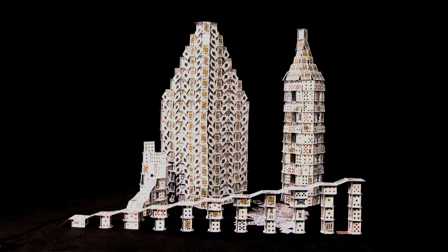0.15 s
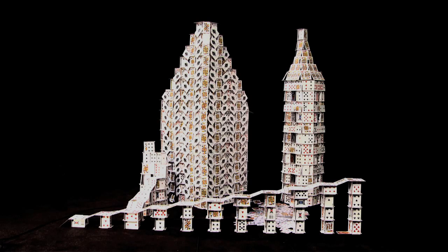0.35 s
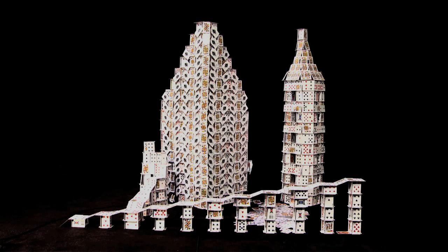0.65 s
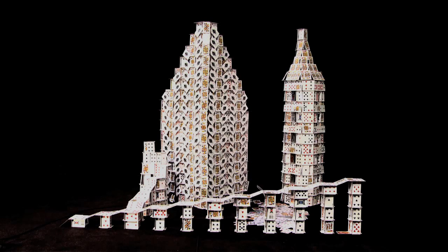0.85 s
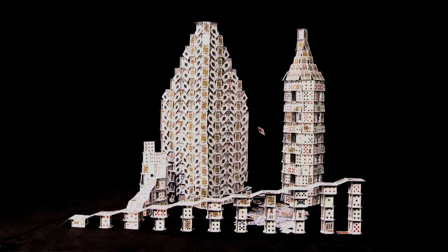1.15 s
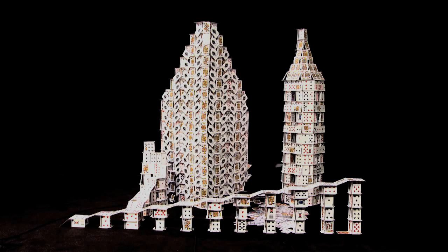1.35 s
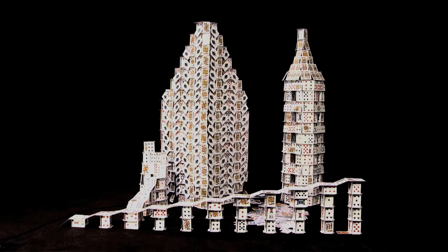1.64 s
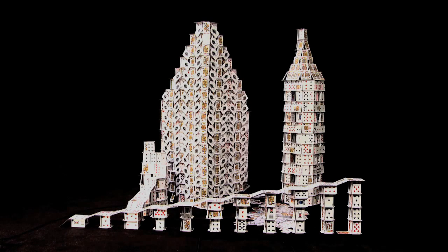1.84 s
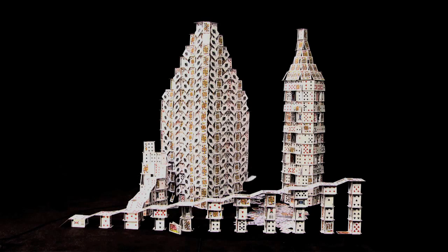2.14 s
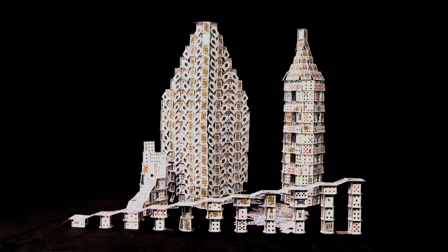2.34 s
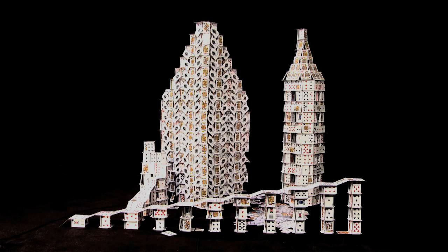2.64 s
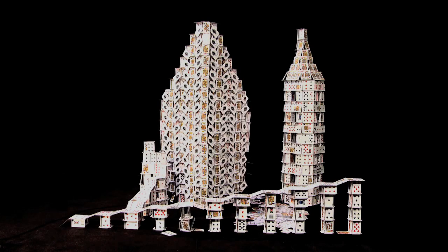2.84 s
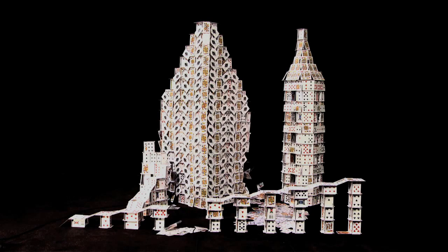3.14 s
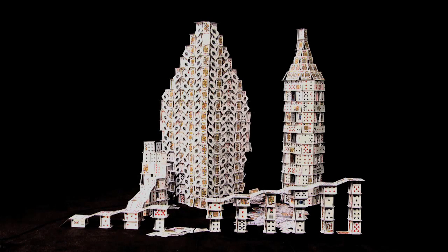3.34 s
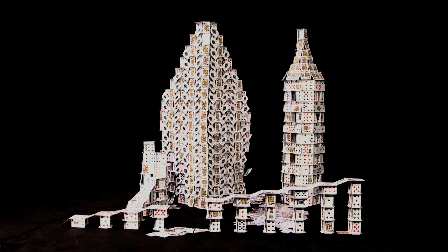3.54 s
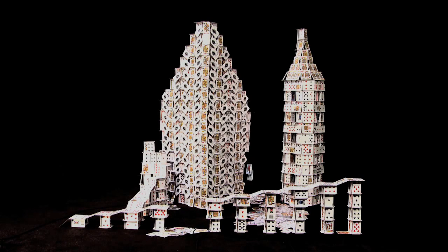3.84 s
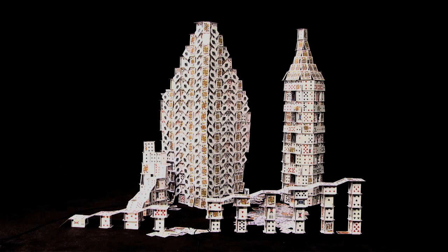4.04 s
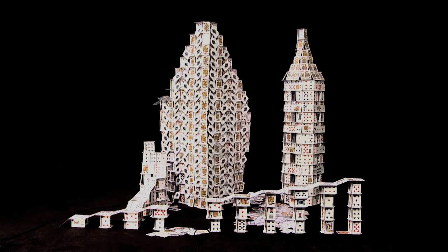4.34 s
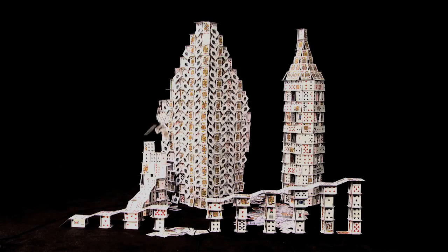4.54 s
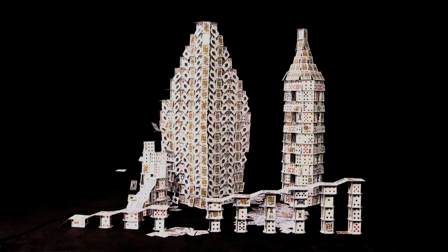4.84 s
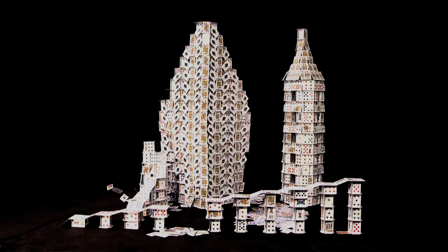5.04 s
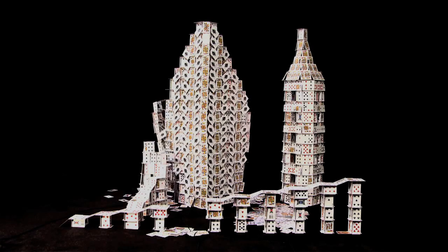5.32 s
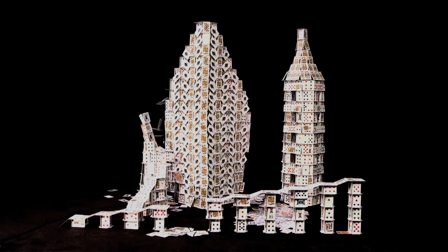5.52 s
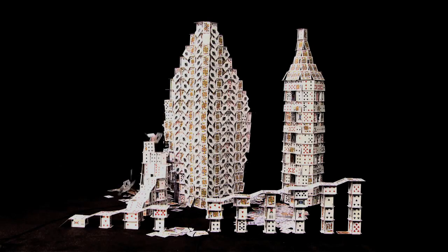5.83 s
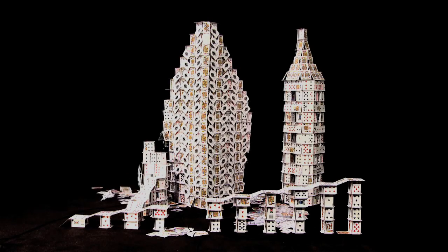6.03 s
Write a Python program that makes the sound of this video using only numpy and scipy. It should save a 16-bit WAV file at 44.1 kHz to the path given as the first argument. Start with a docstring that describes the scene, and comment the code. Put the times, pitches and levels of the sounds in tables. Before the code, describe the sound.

In a quiet hall, a house of cards sheds sparse light clicks, then fluttering heaps of falling cards, the hardest crack coming near the end.

```python
"""A tall house of cards is knocked down in a quiet hall, over faint ventilation rumble, hiss and fan tones.
First come light slides and single cards that snap loose, bend in two modes, slap flat and tick on their edges.
Then whole storeys slide and clatter onto the pile as countless small touches, with stray cards among them.
The loudest hits come near the end. Near surfaces echo the direct sound, the hall answers with scatter and a
tail, and the microphone's tone colour shapes all card sounds alike."""
import sys
import numpy as np
from scipy import signal
from scipy.fft import rfft, irfft
from scipy.io import wavfile
from scipy.ndimage import uniform_filter1d

SR = 44100
rng = np.random.default_rng(int(sys.argv[2]) if len(sys.argv) > 2 else 0)


def waveform_to_disk(signal):
    """Save audio, clipped to [-1, 1], as 16-bit WAV at the path in sys.argv[1]."""
    frames = np.transpose(np.atleast_2d(signal))
    scaled = np.clip(frames, -1, 1) * 32767
    samples = np.round(scaled).astype(np.int16)
    wavfile.write(sys.argv[1], SR, samples)


N = 272538


def from_db(db):
    """Decibels to amplitude gain."""
    return 10 ** (np.asarray(db) / 20)


def rms_one(x):
    """Scale to unit rms."""
    return x / np.sqrt(np.mean(x ** 2) + 1e-20)


def burst_one(x):
    """Scale a burst so that its loudest 4 ms have unit rms."""
    return x / np.sqrt(uniform_filter1d(x ** 2, size=176).max() + 1e-20)


def gains_in_time(rows):
    """One gain per sample for each dB column of a curve whose first column is time."""
    seconds, *columns = np.transpose(rows)
    t = np.arange(N) / SR
    return [from_db(np.interp(t, seconds, level_db)) for level_db in columns]


def at_hz(points, hz):
    """Read a table along log frequency."""
    freqs, values = np.transpose(points)
    return np.interp(np.log(np.maximum(hz, 1)), np.log(freqs), values)


def cut(x, hz, kind, order=2):
    """Butterworth filter."""
    sections = signal.butter(order, np.clip(hz, 10, .45 * SR), kind, fs=SR, output="sos")
    return signal.sosfilt(sections, x)


def resonate(x, hz, width_hz):
    """Two-pole resonance with unit gain at its peak."""
    r = np.exp(-np.pi * width_hz / SR)
    numerator = np.array([1, 0, -1]) * (1 - r * r) / 2
    denominator = [1, -2 * r * np.cos(2 * np.pi * hz / SR), r * r]
    return signal.lfilter(numerator, denominator, x + 1e-18)


# Spectrum of the ventilation and room air. Each row: frequency in Hz, relative density in dB.
AIR_SPECTRUM = [(12, -74), (20, 6.5), (33, -4.5), (47, 2), (62, -9), (100, -13.5), (119, -3.5), (145, -18),
                (270, -27.5), (700, -36), (2400, -44), (3400, -56), (4600, -58.5), (16000, -57.5)]
AIR_DB = -38  # rms of the whole air noise
# Fan tones in the duct. Each row: time in seconds, rms of the lower tone in dB, rms of the upper tone in dB.
FAN_LEVELS = [(0, -74, -57.5), (.35, -54.5, -60.5), (.6, -49.5, -67), (1.801, -49, -56), (2.15, -57, -59),
              (2.8, -65, -62), (4.4, -67, -66), (5.1, -51, -64), (6.18, -49, -54)]
# Pitches of the lower and the upper fan tone, in Hz.
FAN_HZ = (177.7, 209.4)


def ventilation():
    """Shaped noise is duct rumble and air hiss; two sines are fan tones that swell and fade."""
    spectrum = rfft(rng.standard_normal(N))
    air = irfft(spectrum * from_db(at_hz(AIR_SPECTRUM, np.arange(N // 2 + 1) * SR / N)), N)
    t = np.arange(N) / SR
    tones = 0
    for hz, gain in zip(FAN_HZ, gains_in_time(FAN_LEVELS)):
        tones = tones + gain * np.sqrt(2) * np.sin(2 * np.pi * (hz * t + rng.random()))
    return from_db(AIR_DB) * rms_one(air) + tones


# Groups of cards sliding and tumbling. Each row: centre in seconds, half length in seconds (power down
# to 1/e), crackle in dB before the mix, flutter of flat faces in dB against the crackle.
CARD_SLIDES = [(0.026, 0.054, -57, -2), (0.612, 0.035, -54.5, -22), (0.895, 0.012, -42.5, -2.5),
               (1.228, 0.039, -53.5, 3), (1.363, 0.028, -56.5, -12), (1.626, 0.014, -47, 9),
               (2.22, 0.12, -59, 3), (2.269, 0.017, -45, -9), (2.829, .13, -52, -10),
               (3.158, 0.077, -41, -5), (3.303, 0.017, -46, 4), (3.413, 0.036, -43, -3),
               (3.675, 0.051, -45, -6), (4.151, 0.13, -52.5, -2.5), (4.37, 0.062, -50, 5),
               (4.632, 0.088, -50.5, 3), (4.817, 0.06, -43.5, -5.5), (4.961, .05, -43, 2.5),
               (5.258, 0.12, -45.5, -6), (5.492, 0.044, -43.5, 3), (5.651, 0.078, -43.5, -1.5),
               (5.807, 0.026, -42, 11.5), (5.906, 0.046, -33, -1), (6.052, .1, -47, 4),
               (6.172, 0.0091, -40, 17)]
EDGE_SCRAPE_DB = -12.5  # against the crackle, before the mix; edges scrape in step with it


def slide_gains():
    """Slides swell and ebb like bell curves and add in power: gains of flutter, crackle and scrape."""
    centre, half_length, crackle_db, flat_db = np.transpose(CARD_SLIDES)
    t = np.arange(0, N, 32) / SR
    swell = np.exp(-((t - centre[:, None]) / half_length[:, None]) ** 2)
    gains = []
    for db in (crackle_db + flat_db, crackle_db, crackle_db + EDGE_SCRAPE_DB):
        power = from_db(db) ** 2 @ swell
        gains.append(np.interp(np.arange(N) / SR, t, np.sqrt(power)))
    return gains


def slap(force):
    """A card landing flat squeezes out a dull puff of air."""
    return cut(resonate(force, 578, width_hz=640), 1500, "low")


def snap(force, hz, width_hz, upper_db):
    """A card rings for a few cycles in two bending modes; they give out below the high treble."""
    lower_mode = resonate(force, hz, width_hz)
    upper_mode = resonate(force, 1.637 * hz, width_hz)
    modes = lower_mode - from_db(upper_db) * upper_mode
    return cut(modes, max(4350, 1.71 * hz), "low", order=6)


def tick(force, edge_hz):
    """Stiff edges click across the treble."""
    return cut(cut(force, np.clip(edge_hz, 4300, 12000), "high"), 13300, "low")


def tumble(per_s, spread_db, flutter_db, crackle_db, scrape_db):
    """Countless light touches of uneven size, each on one of eight cards with its own flex pitch."""
    flutter, crackle, scrape = slide_gains()
    sizes = from_db(spread_db * np.minimum(rng.exponential(1, N), 3.5)) * rng.choice([-1, 1], N)
    touches = sizes * (rng.random(N) < per_s / SR)
    count = 8
    card = rng.integers(0, count, N)
    flexing = 0
    for k, hz in enumerate(np.linspace(1050, 2550, count)):
        flexing = flexing + snap(touches * (card == k), hz, width_hz=147, upper_db=-5.0)
    # faces rubbing together add a smooth hiss between the touches
    rubbing = rms_one(touches) + from_db(-0.5) * rng.standard_normal(N)
    return (from_db(flutter_db) * flutter * rms_one(slap(touches))
            + from_db(crackle_db) * crackle * rms_one(flexing)
            + from_db(scrape_db) * scrape * rms_one(tick(rubbing, edge_hz=3900)))


# The loudest card hits, levels before the mix. Each row: time of contact in seconds, snap in dB,
# flex pitch in Hz, flat slap in dB, edge tick in dB.
LOUD_HITS = [(0.1575, -32, 1600, -43, -51), (0.8054, -21.5, 1440, -43, -48), (0.8056, -26, 3760, -46, -55),
             (0.8122, -18, 1330, -52, -38.5), (.8171, -25.5, 2360, -47, -41.5),
             (0.8885, -35, 2346, -51, -51), (1.633, -27.5, 1320, -59, -55), (1.7215, -26, 3160, -36.5, -33),
             (1.7332, -28.5, 2220, -66, -32.5), (2.2451, -34, 2290, -44, -55.5),
             (2.361, -36, 1223, -43, -57), (2.7435, -29.5, 1550, -38.5, -55),
             (3.0251, -37, 1260, -43, -45.5), (3.0693, -20, 2123, -62, -39),
             (3.1154, -31.5, 2235, -55, -40), (3.1614, -27, 2320, -30, -48),
             (3.1662, -34, 1445, -55, -40.5), (3.349, -37, 1597, -61.5, -46),
             (3.4012, -30.5, 1290, -36.5, -45.5), (3.4353, -38.5, 970, -51, -43.5),
             (3.6248, -31, 1250, -32, -43.5), (3.6479, -24, 1060, -29, -48), (3.6599, -20, 890, -39, -42.5),
             (4.0436, -46, 1140, -46, -53), (4.311, -33.5, 1990, -39.5, -56),
             (4.4945, -44.5, 950, -38.5, -56), (4.5994, -36, 2230, -48, -59),
             (4.701, -24.5, 1400, -63, -46.5), (4.7578, -23, 2090, -37, -41.5),
             (4.9138, -31, 2350, -63, -46), (4.971, -25, 3080, -35.5, -46), (5.149, -31.5, 2200, -44, -46),
             (5.226, -33.5, 2140, -53, -51), (5.249, -30.5, 940, -42.5, -62),
             (5.294, -30.5, 1550, -39, -47), (5.373, -25, 1900, -55, -45), (5.44, -29, 1460, -34, -55),
             (5.4861, -25, 2180, -57, -40), (5.63, -45, 950, -24.5, -54.5), (5.677, -41, 998, -48, -52.5),
             (5.7738, -52, 950, -32, -52), (5.8204, -54, 974, -26.5, -50), (5.8585, -48, 1068, -27, -51),
             (5.8755, -14.5, 2020, -24, -31), (5.8763, -18.5, 895, -29.5, -43),
             (6.1522, -23.5, 1250, -23, -49), (6.1629, -36, 990, -31.5, -44.5)]
# contact time when the tick is as loud as the body, and how much longer a duller hit lasts (exponent)
CONTACT_S, CONTACT_SOFTENS = 0.00049, 0.97
REBOUND_S, REBOUND_DB = .003, -9  # second touch: delay before random scaling, strength against the first


def card_hits(hits, snap_db, slap_db, tick_db, relative_width, chatter):
    """Each hit is a brief graze, one push, a rebound and a quickly dying chatter of tiny contacts."""
    size, lead = SR // 16, SR // 100
    t, out = (np.arange(size) - lead) / SR, np.zeros(N + size)
    graze = .3 * np.exp(-np.abs(t) / .0015) * (t < 0)
    for s, snap_level, hz, slap_level, tick_level in hits:
        grit, delay = rng.standard_normal((2, size)), rng.uniform(.5, 2)
        # a card that lands on its edge touches more briefly than one that lands flat
        dullness_db = max(snap_level, slap_level) - tick_level
        contact = CONTACT_S * from_db(CONTACT_SOFTENS * dullness_db)
        force = chatter * grit * (graze + (t >= 0) * np.exp(-np.abs(t) / contact))
        force[:, lead] += 1
        # the card's other edge comes down a moment later
        rebound = int(np.clip(abs(REBOUND_S * delay) * SR, 1, size // 2))
        force[:, lead + rebound] += from_db(REBOUND_DB)
        flexing = snap(force[0], hz, min(relative_width, 2) * hz, upper_db=-13.5)
        # the shorter the contact, the brighter its click
        click = tick(force[1], edge_hz=7 / contact)
        sound = from_db(snap_level + snap_db) * burst_one(flexing)
        sound += from_db(slap_level + slap_db) * burst_one(slap(force[0]))
        sound += from_db(tick_level + tick_db) * burst_one(click)
        start = int(np.clip(s * SR - lead, 0, N))
        out[start:start + size] += sound
    return out[:N]


# Stray cards: full rate, reached where the crackle is at STRAY_BUSY_DB; snap above the crackle, spread.
STRAYS_PER_S, STRAY_BUSY_DB, STRAY_DB, STRAY_SPREAD_DB = 16, -46, 14.5, 1.5
STRAY_SLAP_DB, STRAY_TICK_DB = -19.5, -21  # against their snap, before spread and mix
# Lowest and highest flex pitch of a stray card, in Hz.
STRAY_PITCH_HZ = (950, 2220)


def stray_hits():
    """Cards bounce out of the slides, more often and harder while more slide; columns as in LOUD_HITS."""
    count = 300
    when, chance, pitch = rng.random((count, 3)).T
    snap_spread, slap_spread, tick_spread = STRAY_SPREAD_DB * rng.standard_normal((count, 3)).T
    flow = slide_gains()[1][(when * N).astype(int)]
    level = 20 * np.log10(flow + 1e-9) + STRAY_DB
    lowest, highest = STRAY_PITCH_HZ
    rows = np.transpose([when * N / SR,
                         level + snap_spread,
                         lowest * (highest / lowest) ** pitch,
                         level + STRAY_SLAP_DB + slap_spread,
                         level + STRAY_TICK_DB + tick_spread])
    rate = STRAYS_PER_S * np.minimum(flow / from_db(STRAY_BUSY_DB), 1)
    return rows[chance < rate * N / SR / count]


# Near surfaces. Each row: delay after the direct sound in seconds, level against it in dB, cut-off in Hz.
NEAR_SURFACES = [(.0068, -13, 1970), (0.0105, -16.5, 11900)]


def near_echoes(x):
    """The direct sound at the microphone, with delayed and dulled first reflections."""
    echoes = 0
    for delay, level_db, cut_hz in NEAR_SURFACES:
        late = np.pad(cut(x, cut_hz, "low", order=1), (int(abs(delay) * SR), 0))[:N]
        echoes = echoes + from_db(level_db) * late
    return x + echoes


# The hall's decay and colour. Each row: frequency in Hz, time to fall by 60 dB in seconds, colour in dB.
HALL_BANDS = [(300, 0.55, 2.5), (825, 0.58, 2), (2570, 0.69, -4.5), (2720, 0.65, -7.5), (4300, 0.3, -10),
              (6150, 0.47, 1.5), (15000, 0.45, -4.5)]


def hall(x, scatter_db, scatter_t60, tail_db, build_s):
    """A short scatter off the card walls and a tail that dies band by band, both coloured by the hall."""
    t, table = np.arange(SR) / SR, np.array(HALL_BANDS)
    white = rng.standard_normal((3, SR))
    edges = np.geomspace(150, 18000, 8)
    tail = 0
    for k, (low, high) in enumerate(zip(edges, edges[1:])):
        t60 = at_hz(table[:, :2], np.sqrt(low * high))
        # neighbouring bands draw on separate noises
        tail = tail + cut(white[k % 2], [low, high], "band") * from_db(-60 * t / t60)
    scatter = white[2] * from_db(-60 * t / scatter_t60)
    build = 1 - np.exp(-(t / build_s) ** 2)
    response = from_db(tail_db) * rms_one(tail * build) + from_db(scatter_db) * rms_one(scatter * build)
    response = response / np.sqrt(SR)
    colour = from_db(at_hz(table[:, ::2], np.arange(SR // 2 + 1)))
    response = irfft(rfft(response) * colour, SR)
    return signal.fftconvolve(x, response)[:N]


# Tone colour of the microphone: boosts and dips shared by all card sounds. Each row: centre in Hz,
# width in Hz, gain of this stage at its centre in dB.
COLOUR_BANDS = [(280, 81, 3), (432, 175, 2.5), (643, 22, -2), (863, 110, 5.5), (1550, 840, 2.5),
                (2316, 250, 5.5), (4670, 270, -12), (5000, 570, 2.5), (10830, 560, 6.5), (15000, 500, 8)]


def microphone_colour(x):
    """Boosts and dips in series, each adding or taking away a resonant band of the signal."""
    for hz, width_hz, level_db in COLOUR_BANDS:
        x = x + (from_db(level_db) - 1) * resonate(x, hz, width_hz)
    return x


def scene():
    """Hits and sliding cards in the hall, over the ventilation."""
    air = ventilation()
    sliding = tumble(per_s=550, spread_db=6.0, flutter_db=-11.0, crackle_db=-10, scrape_db=-4.5)
    hits = np.vstack([LOUD_HITS, stray_hits()])
    ahead = card_hits(hits, snap_db=-14.0, slap_db=-7, tick_db=-4.5, relative_width=0.13, chatter=0.32)
    # the hall gathers what a card radiates in all directions, a broader mix of its modes
    around = card_hits(hits, snap_db=-12.0, slap_db=-9.0, tick_db=-6.5, relative_width=0.68, chatter=0)
    reverberation = hall(around + sliding, scatter_db=-3.5, scatter_t60=0.068, tail_db=-5.5, build_s=0.0099)
    cards = near_echoes(ahead + sliding) + reverberation
    return (microphone_colour(cards) + air)[None]


CUTOFF_HZ = 16000


def record(dry):
    """An elliptic low-pass cuts the top steeply."""
    sections = signal.ellip(10, .1, 80, CUTOFF_HZ, fs=SR, output="sos")
    return signal.sosfilt(sections, dry)


dry = scene()
out = record(dry)
waveform_to_disk(out)
```